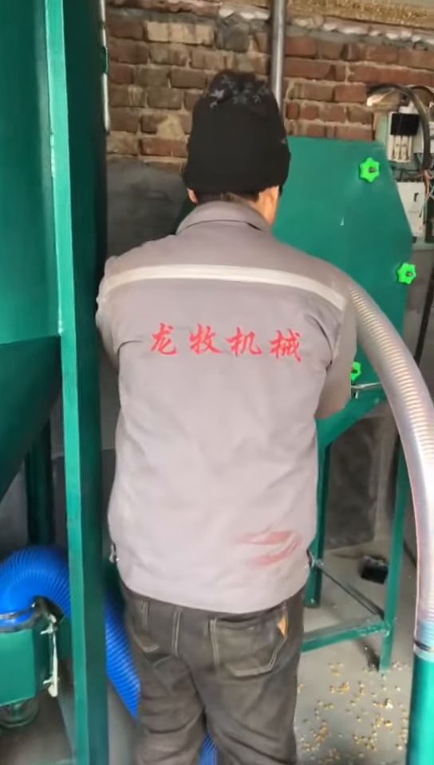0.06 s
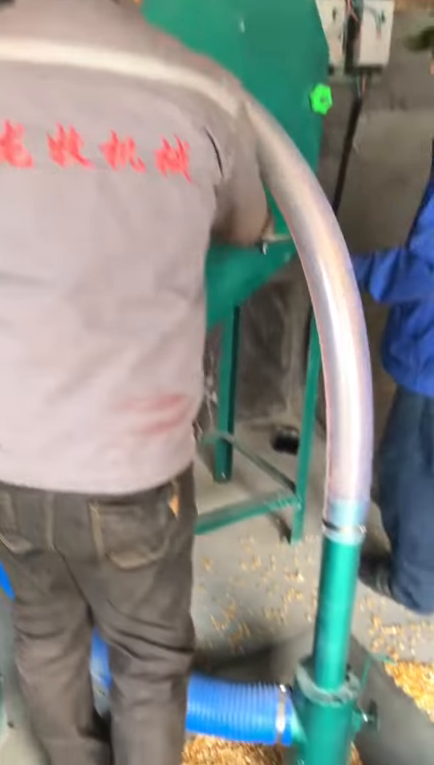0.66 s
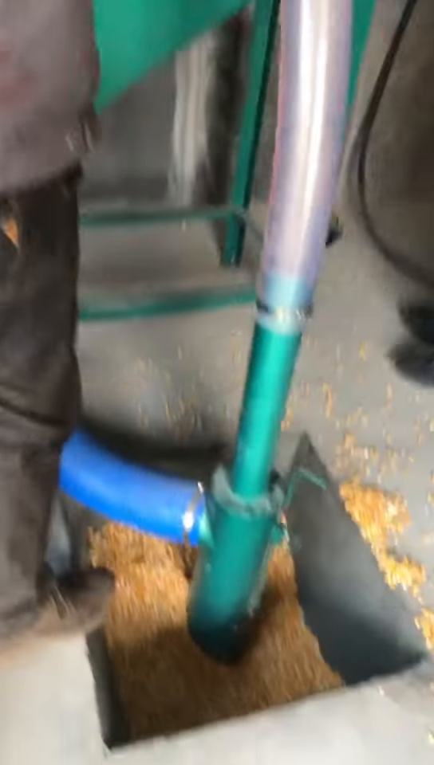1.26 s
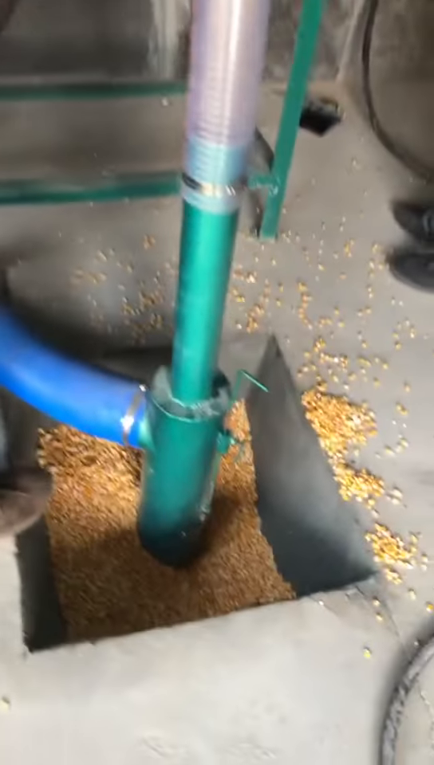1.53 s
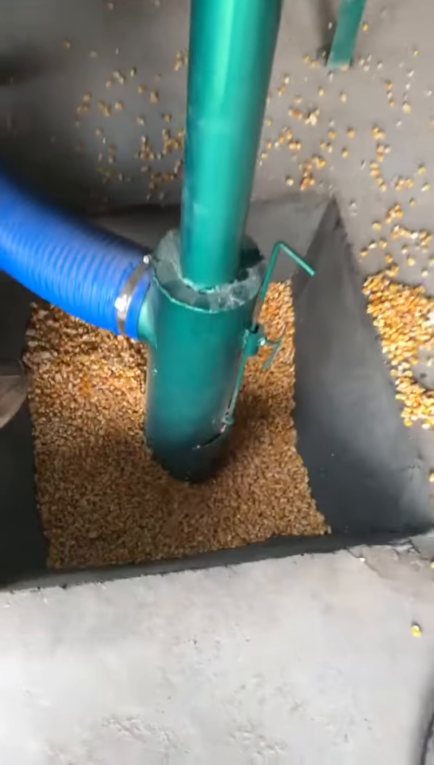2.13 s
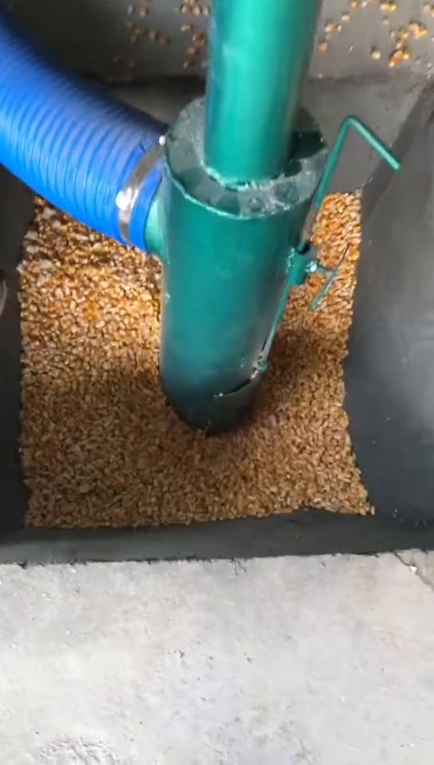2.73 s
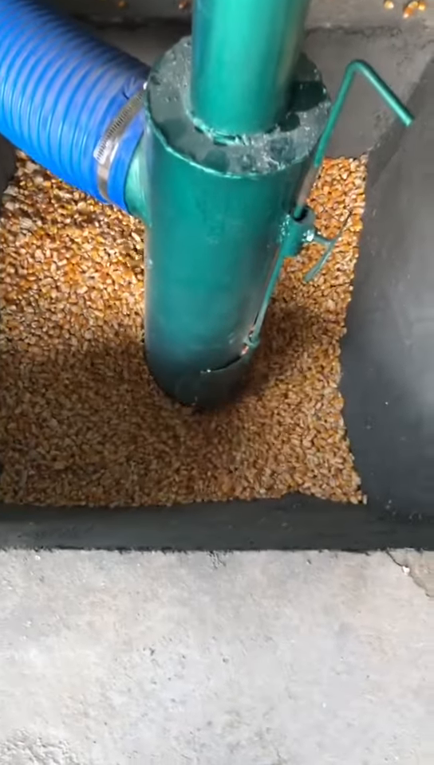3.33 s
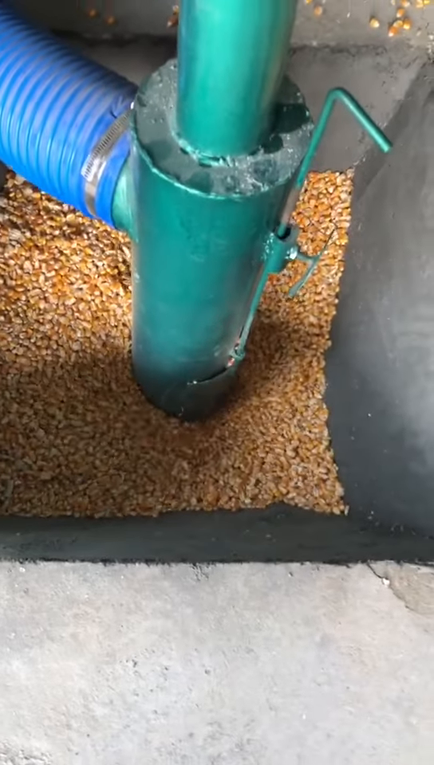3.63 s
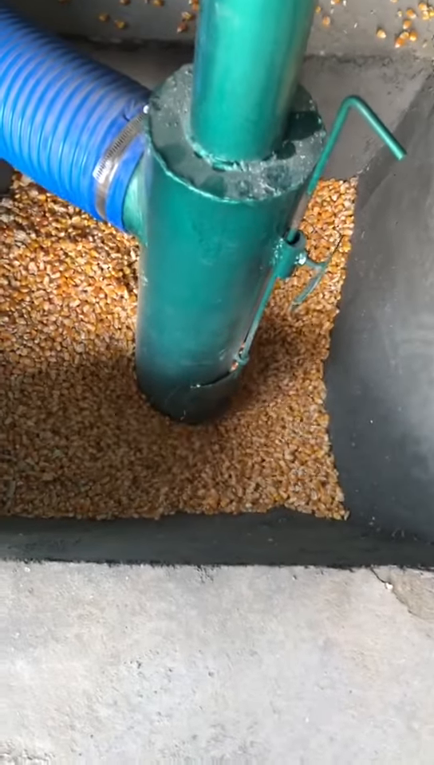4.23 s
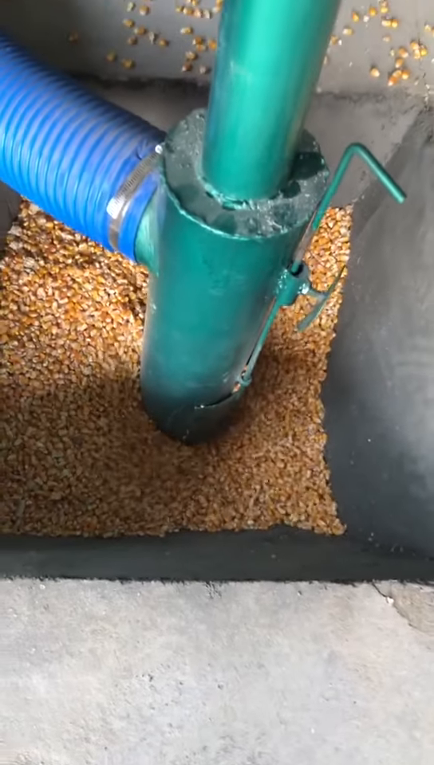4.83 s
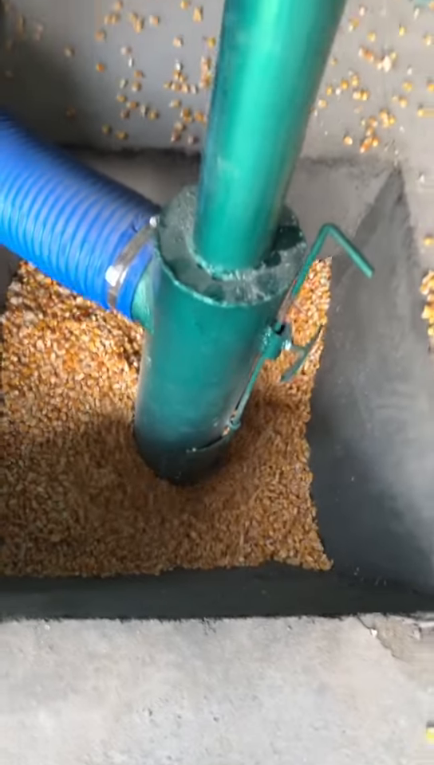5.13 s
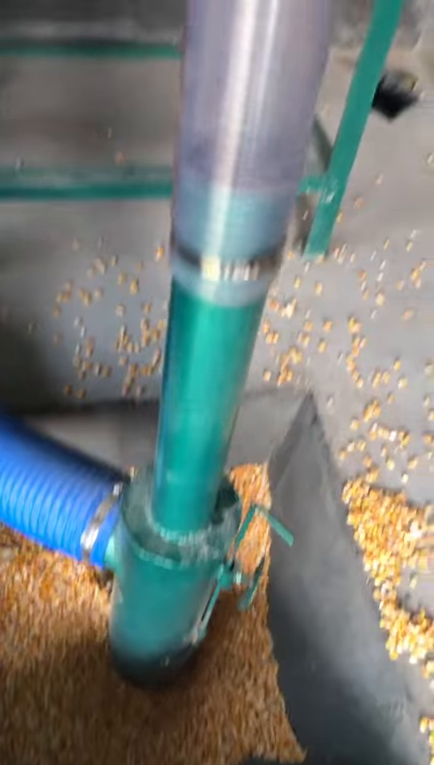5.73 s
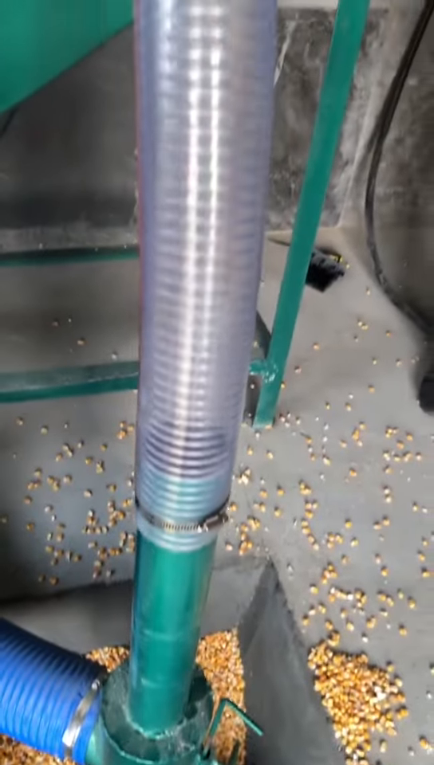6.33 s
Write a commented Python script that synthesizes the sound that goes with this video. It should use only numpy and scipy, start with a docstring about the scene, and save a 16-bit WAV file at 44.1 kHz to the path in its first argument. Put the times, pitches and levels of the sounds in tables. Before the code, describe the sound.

Loud, steady rush of air and rattling grain being sucked up a steel pipe, over the hum of a grinding machine.

```python
"""In a brick workshop, a hammer mill sucks maize out of a floor pit through a steel nozzle and a hose.
Thousands of kernels a second crack against the steel pipe, set it ringing and patter up the ribbed hose.
Air hisses into the nozzle, and grain and air surge unevenly together. Behind them the spinning rotor
and its fan hum, the fan roars and the housing rumbles. One microphone moves down to the nozzle and back."""
import sys
import numpy as np
from scipy import signal
from scipy.fft import rfft, irfft, next_fast_len
from scipy.io import wavfile
from scipy.ndimage import map_coordinates

SR = 44100
rng = np.random.default_rng(int(sys.argv[2]) if len(sys.argv) > 2 else 0)


def master(y):
    """Save y as 16-bit WAV."""
    cut = np.clip(np.atleast_2d(y).T, -1, 1)
    pcm = np.round(cut * 32767)  # scale
    wavfile.write(sys.argv[1], SR, pcm.astype(np.int16))


N = 290178
CUTOFF_HZ = 14200


def from_db(db):
    """Turn decibels into a number to multiply by."""
    return 10 ** (np.asarray(db) / 20)


def rms_one(x):
    """Scale a signal so that its average strength (rms) is 1."""
    return x / np.sqrt(np.mean(x ** 2) + 1e-20)


def in_time(rows):
    """Join a table's timed points with straight lines: one curve for each column after the time."""
    times, *columns = np.transpose(rows)
    return [np.interp(np.arange(N) / SR, times, column) for column in columns]


def filtered(x, gain_at):
    """Turn each frequency up or down by gain_at(hz)."""
    size = next_fast_len(N + SR // 10)
    hz = np.maximum(np.arange(size // 2 + 1) * SR / size, 1)
    return irfft(rfft(x, size) * gain_at(hz), size)[:N]


def coloured(x, spectrum):
    """Shape the lows and highs by a table, then scale to strength 1."""
    points_hz, level_db = np.transpose(spectrum)
    return rms_one(filtered(x, lambda hz: from_db(np.interp(np.log(hz), np.log(points_hz), level_db))))


def drift(slow_hz, fast_hz):
    """A random wobble of strength 1, mostly between two rates."""
    noise = rng.standard_normal(N)
    return rms_one(filtered(noise, lambda hz: 1 / (1 + (slow_hz / hz) ** 4) / (1 + (hz / fast_hz) ** 2)))


def swells(rows):
    """Smooth bumps and dips in dB; each length is the width at half height."""
    t = np.arange(N) / SR
    return sum(db * 2 ** -(2 * (t - middle) / length) ** 2 for middle, length, db in rows)


def resonance(x, hz, width_hz):
    """Ring at one pitch; the narrower the width, the longer the ring."""
    r = np.exp(-np.pi * width_hz / SR)
    feedback = [1, -2 * r * np.cos(2 * np.pi * hz / SR), r * r]
    return signal.lfilter(np.array([1, 0, -1]) * (1 - r * r) / 2, feedback, x + 1e-18)


def workshop(x, fade_s, echo_db, spots=9):
    """Brick walls return a short wash of echoes that changes as the microphone moves."""
    t = np.arange(SR // 3) / SR
    path, echoes = np.linspace(0, spots - 1, N), 0
    for spot in range(spots):
        tail = rms_one(rng.standard_normal(len(t)) * from_db(-60 * t / fade_s)) / np.sqrt(len(t))
        share = np.cos(np.pi / 2 * np.minimum(abs(path - spot), 1))
        echoes = echoes + share * signal.oaconvolve(x, tail)[:N]
    return rms_one(x + from_db(echo_db) * echoes)


def pit(x, echo_db, sway_s, count=6):
    """Echoes in the pit boost some pitches and weaken others; these slide as the microphone sways."""
    out = x
    for delay_s in rng.uniform(0.001992, .008, count):
        delay = (delay_s + sway_s * drift(slow_hz=.15, fast_hz=0.56)) * SR
        out = out + from_db(echo_db) * map_coordinates(x, [np.arange(N) - delay], order=1, mode="wrap")
    return rms_one(out)


def tone(turns, per_turn, level_db, waver_db):
    """A tone that vibrates per_turn times in each turn of the rotor, wavering with the load."""
    level = from_db(level_db + waver_db * drift(slow_hz=1, fast_hz=22))
    return np.sqrt(2) * level * np.sin(2 * np.pi * (per_turn * turns + rng.random()))


def mill(near, blades=4):
    """The off-balance rotor and passing fan blades hum over the housing's rumble and the fan's roar."""
    # the fan along the microphone's path: t/s, blade tone/dB, its octave/dB, roar/dB
    fan_levels = [(0, -36, -50, -44.5), (.55, -37.5, -53.5, -46.5), (1.05, -38.3, -47, -46),
                  (1.6, -37.5, -53.5, -64), (2.2, -44, -55.5, -53), (3.1, -41.5, -58, -50.5),
                  (3.8, -43.2, -53, -48.5), (4.8, -42.5, -53, -55), (5.35, -49, -52, -51.5),
                  (5.85, -48.5, -46.5, -49), (6.58, -55, -50, -53)]
    # other rotor tones: vibrations per turn, level by the hose/dB, level at the nozzle/dB
    rotor_tones = [(1, -53, -53), (2, -50, -46.5), (6, -66, -62), (12, -59, -43), (17, -49.5, -56),
                   (20, -55, -57), (28, -42, -53)]
    # tone colour of the rumbling housing: f/Hz, relative level/dB
    rumble_colour = [(15, -22), (38, -21), (62, -3), (85, -2), (135, 1), (160, 2.5), (205, 1.5),
                     (250, -9.5), (400, -22), (1500, -49)]
    # tone colour of the roaring fan: f/Hz, relative level/dB
    roar_colour = [(100, -7), (230, 3), (265, -2), (310, 3.5), (380, -5), (440, -2), (600, -10.5),
                   (1500, -33)]
    blade_db, octave_db, roar_db = in_time(fan_levels)
    turns_per_s = 48.43 + .066 * np.arange(N) / SR   # slowly gaining speed
    turns = np.cumsum(turns_per_s * (1 + 0.0005 * drift(slow_hz=0.72, fast_hz=6))) / SR
    hum = tone(turns, blades, blade_db, waver_db=1.0) + tone(turns, 2 * blades, octave_db, waver_db=2.5)
    rotor = sum(tone(turns, round(per_turn), far_db + (near_db - far_db) * near, waver_db=2.1)
                for per_turn, far_db, near_db in rotor_tones)
    rumble_gain = from_db(-42.5 + 1.2 * drift(slow_hz=1.7, fast_hz=11))
    rumble = rumble_gain * coloured(rng.standard_normal(N), rumble_colour)
    roar_gain = from_db(roar_db + 2.5 * drift(slow_hz=3.6, fast_hz=12))
    roar = roar_gain * coloured(rng.standard_normal(N), roar_colour)
    return hum + rotor + rumble + roar


def air_hiss(near):
    """Air rushing into the nozzle hisses, a little louder close up."""
    # tone colour of the rushing air: f/Hz, relative level/dB
    air_colour = [(250, -45), (440, -26), (490, -10.5), (720, -3.5), (1250, -6.5), (2400, 4.5), (3450, -1),
                  (4200, 1.5), (6200, 1), (7300, -6), (8300, -2), (12800, 2.5), (13600, -2), (14200, -12)]
    return from_db(-4 + 1.5 * near) * coloured(rng.standard_normal(N), air_colour)


def impacts(per_s, spread_db):
    """Kernels strike at random moments, most softly and a few hard."""
    sizes = from_db(spread_db * np.minimum(rng.exponential(1, N), 3))
    return sizes * rng.choice([-1, 1], N) * (rng.random(N) < per_s / SR)


def pipe_ring(hits, notes):
    """Each hit rings each of a tube's own notes by a random amount, as kernels land in different spots."""
    out = 0
    for hz, width_hz, db in notes:
        ring = resonance(hits * rng.standard_normal(N), hz, width_hz)
        out = out + from_db(db) * resonance(ring, hz, hz / 2)   # the wall sounds mainly near the note
    return rms_one(out)


def grain(near):
    """Kernels crack on the steel, ring the pipe and patter up the hose; both ring less at the nozzle."""
    # tone colour of a kernel cracking on steel: f/Hz, relative level/dB
    crack_colour = [(300, -30.5), (480, -27), (700, -3), (1200, -1), (2300, 1.5), (3500, -0.5), (4400, 1),
                    (6200, 3.5), (7400, 1.5), (8200, 1.5), (10000, 0.5), (12800, -10.5), (13600, -9),
                    (14200, -25.5)]
    # notes the steel pipe rings at: f/Hz, width/Hz, relative level/dB
    pipe_notes = [(1955, 95, -6.5), (2122, 140, -3.5), (2216, 180, -8.5), (2470, 115, -10),
                  (4005, 280, -11), (4500, 260, -12), (5740, 400, -10)]
    # notes the hose and hopper ring at: f/Hz, width/Hz, relative level/dB
    hose_notes = [(1560, 130, -2), (2070, 160, -7), (2985, 200, -6.5), (3235, 620, -10.5), (4450, 270, -5),
                  (5580, 100, -7)]
    # big clumps of grain hitting the pipe (+) and gaps between them (-): t/s, length/s, ring change/dB
    clumps = [(.688, 0.075, -10), (.878, 0.053, 0.5), (.98, 0.062, -4), (1.094, 0.06, 3),
              (1.316, .015, 6.5), (1.469, .015, 6), (1.783, 0.081, 4.5), (2.315, .05, 5), (2.857, .07, 3),
              (3.74, 0.11, -5), (4.439, .05, 2), (4.724, 0.056, -4), (5.041, .09, 3), (5.302, 0.035, 6),
              (6.115, .07, 4), (6.42, .04, 1)]
    clumps_db = drift(slow_hz=7.4, fast_hz=18) + swells(clumps)
    crack_db = -4 + drift(slow_hz=11, fast_hz=25)
    crack = from_db(crack_db) * coloured(impacts(per_s=7000, spread_db=2.5), crack_colour)
    pipe_db = -8 - 3.5 * near + clumps_db + 0.77 * drift(slow_hz=16, fast_hz=50)
    pipe = from_db(pipe_db) * pipe_ring(impacts(per_s=3000, spread_db=3.5), pipe_notes)
    hose = from_db(-8 - 11 * near) * pipe_ring(impacts(per_s=4000, spread_db=1.0), hose_notes)
    return crack + pipe + hose


def flicker(x, depth_db, per_s, width_hz):
    """The treble flickers in narrow random patches, more strongly the higher the pitch."""
    hz, times, spectra = signal.stft(x, SR, nperseg=512)
    chance = rng.standard_normal((256, 512))
    grid = np.meshgrid(hz / width_hz, times * per_s, indexing="ij")
    patches = map_coordinates(chance, grid, order=1, mode="wrap")
    gain = from_db(depth_db * (hz / CUTOFF_HZ)[:, None] * np.minimum(rms_one(patches), 1))
    return rms_one(signal.istft(spectra * gain, SR)[1][:N])


def suction(near):
    """Grain and air share one uneven flow, so rattle and hiss rise and fall together."""
    # the strongest surges (+) and lulls (-) of the flow: t/s, length/s, level change/dB
    surges = [(0.268, .04, 1.1), (1.292, .07, 1.1), (1.48, 0.09, -0.7), (1.84, .05, 0.3),
              (3.02, 0.056, 0.9), (4.182, 0.064, -0.5), (4.283, 0.064, 0.3), (4.716, .07, 0.5),
              (5.72, 0.11, -0.6), (6.227, .06, 0.7), (6.47, 0.034, -2.4)]
    flow_db = -13 + 0.64 * drift(slow_hz=5.8, fast_hz=33.8) + swells(surges)
    rattle = from_db(-2) * workshop(grain(near), fade_s=0.19, echo_db=-12)
    rush = pit(rattle + air_hiss(near), echo_db=-18, sway_s=0.0001965)
    return from_db(flow_db) * flicker(rush, depth_db=4.5, per_s=18, width_hz=180)


def scene():
    """One moving microphone hears the suction and the mill, and feeds both channels."""
    # the microphone's path: t/s, nearness (0 up by the hose, 1 down at the nozzle)
    microphone_path = [(0, 0.13), (1.2, 0.15), (2.2, 0.78), (2.8, 0.85), (3.7, 0.91), (4.9, .9),
                       (5.4, 0.072), (6.58, .05)]
    near, = in_time(microphone_path)
    return np.tile(suction(near) + mill(near), (2, 1))


def record(dry):
    """Round off the tallest peaks, then cut away the highest treble."""
    rounded = dry / (1 + (dry / .95) ** 8) ** (1 / 8)
    return signal.sosfilt(signal.ellip(12, .1, 80, CUTOFF_HZ, fs=SR, output="sos"), rounded)


dry = scene()
out = record(dry)
master(out)
```